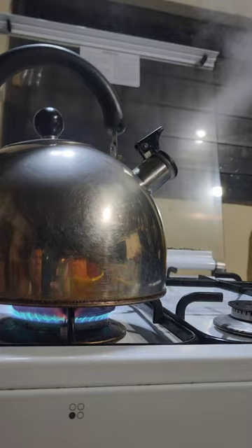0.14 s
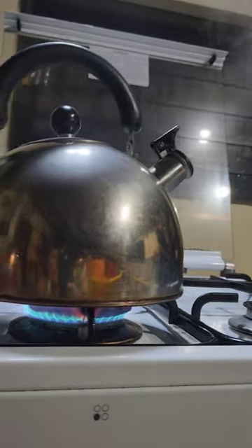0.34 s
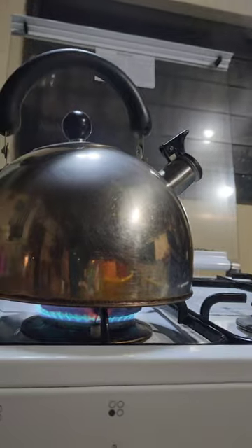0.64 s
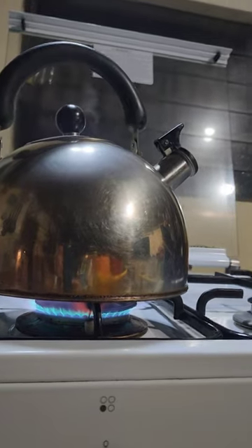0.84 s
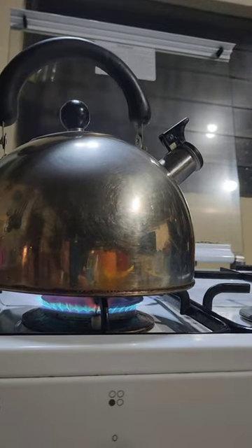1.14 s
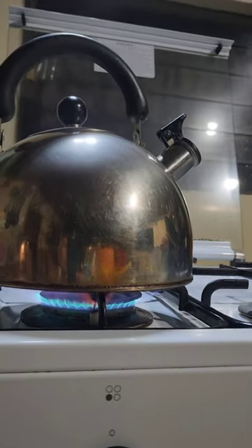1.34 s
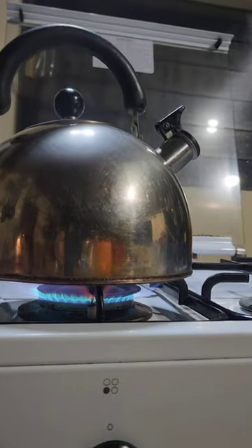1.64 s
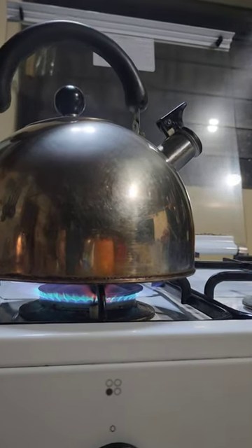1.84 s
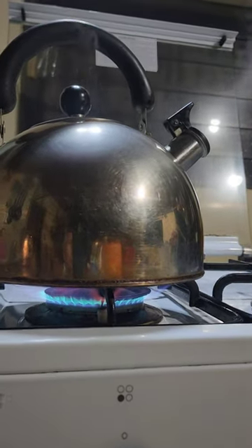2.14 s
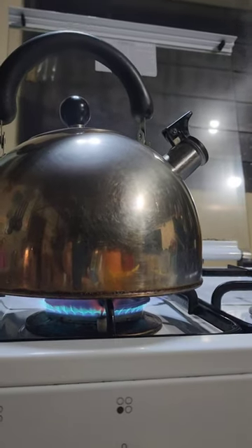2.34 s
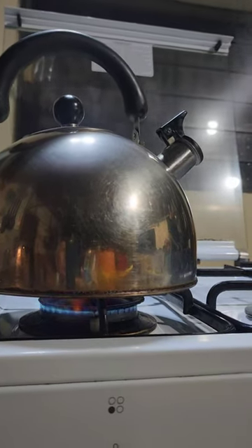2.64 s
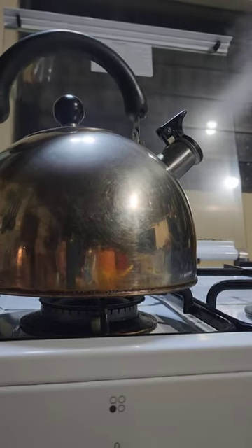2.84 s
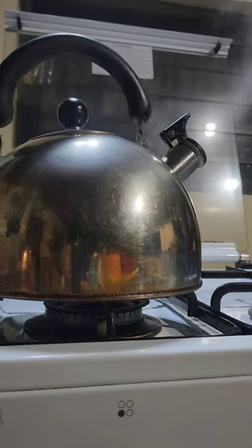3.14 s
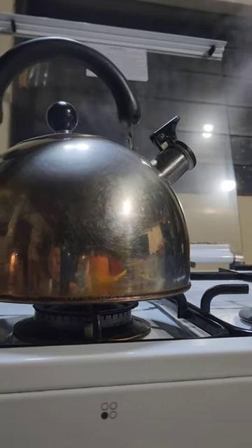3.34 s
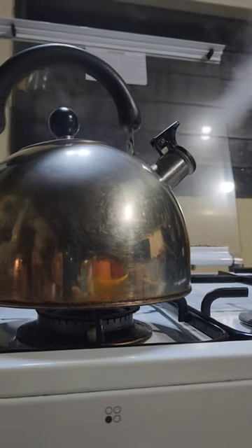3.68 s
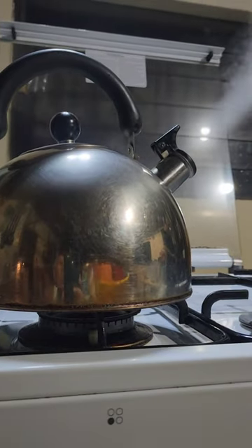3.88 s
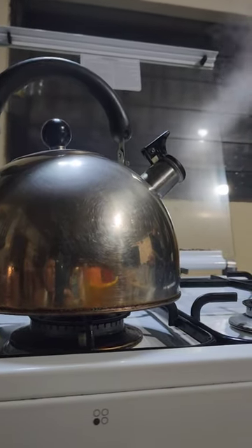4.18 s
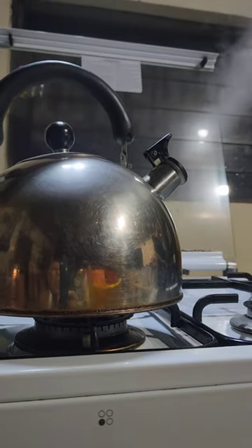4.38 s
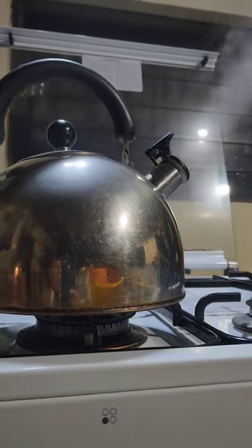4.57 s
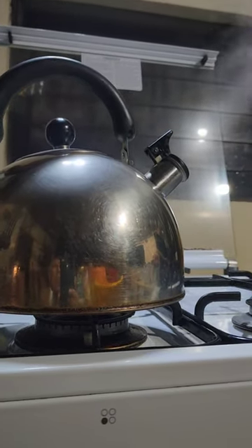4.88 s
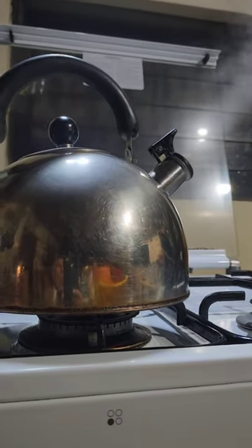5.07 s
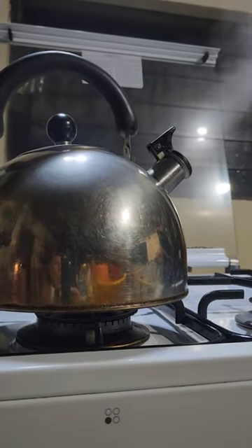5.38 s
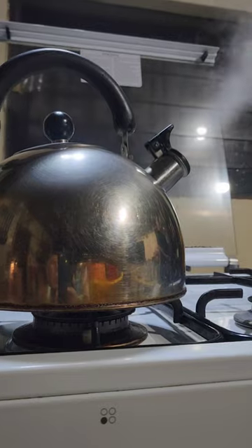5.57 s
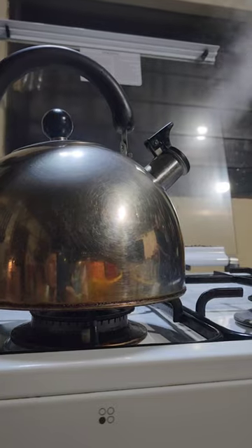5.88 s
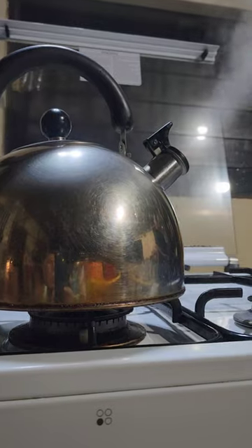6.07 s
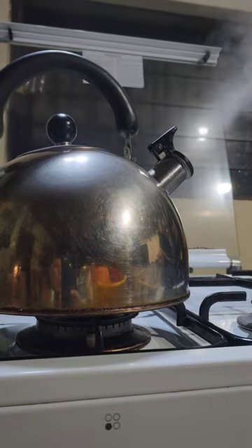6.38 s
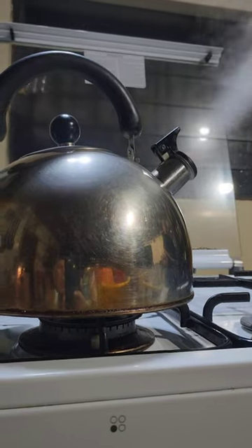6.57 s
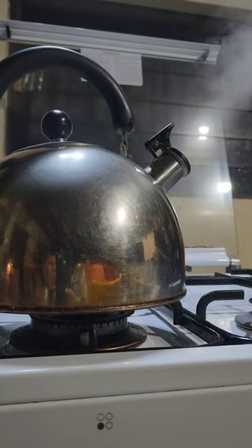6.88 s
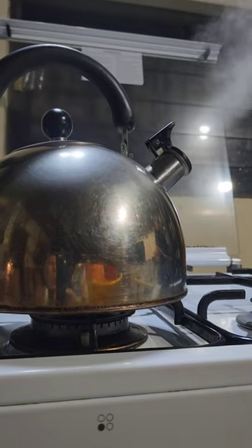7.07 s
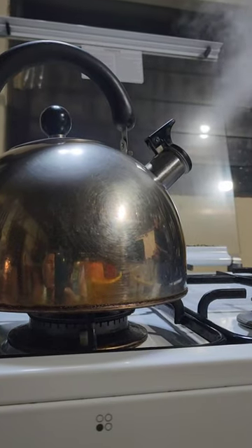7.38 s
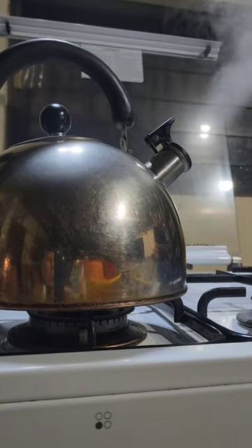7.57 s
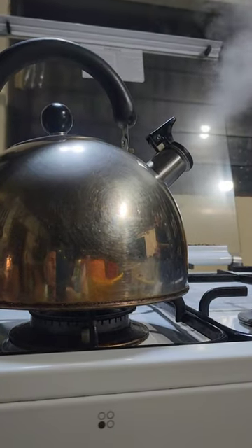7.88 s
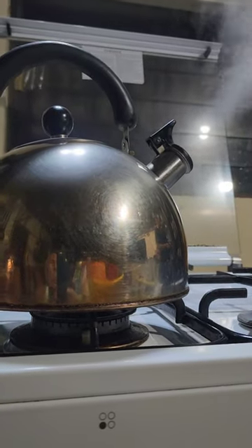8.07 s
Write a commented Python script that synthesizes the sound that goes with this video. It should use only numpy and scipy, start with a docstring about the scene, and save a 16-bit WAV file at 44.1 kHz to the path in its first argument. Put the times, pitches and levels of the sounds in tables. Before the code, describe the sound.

A steel kettle whistles shrill, rough and steady on a gas stove, then glides down in pitch as the flame goes off, jumping higher at the end.

```python
"""A rough, high whistle flutters over a rush of steam: a steel kettle on a gas stove in a small kitchen.
The tone and its harmonics are shaken in pitch and strength by turbulence and beat with the room's echoes.
Once the flame is off the jet slows and the tone slides down, until it jumps up to the next mode of the cap.
Filtered noise makes the hiss and the stove's rumble, a narrow band of it the drone of the water,
and decaying noise bursts in low resonances make soft knocks."""
import sys
import numpy as np
from scipy import signal
from scipy.io import wavfile
from scipy.ndimage import uniform_filter1d

SR = 44100
rng = np.random.default_rng(int(sys.argv[2]) if len(sys.argv) > 2 else 0)


def dump(signal):
    """Clip the signal to [-1, 1] and save it as 16-bit WAV at the path in sys.argv[1]."""
    limited = np.clip(np.atleast_2d(signal).T, -1, 1)
    pcm = np.round(limited * 32767).astype(np.int16)
    wavfile.write(sys.argv[1], SR, pcm)


N = 362502
TIME = np.arange(N) / SR
EDGE_HZ = 15750  # upper band limit of the whole sound
LAG = 7  # samples by which the right microphone hears the direct sound later


def amp(db):
    """Logarithmic level: decibels to an amplitude ratio."""
    return 10 ** (np.asarray(db) / 20)


def unit(x):
    """Normalisation of power: scales a signal to rms 1."""
    return x / np.sqrt(np.mean(abs(x) ** 2) + 1e-20)


def curves(rows, t=TIME):
    """Linear interpolation in time: one curve for each column of a table after the first."""
    s, *columns = np.transpose(rows)
    return [np.interp(t, s, c) for c in columns]


def read(points, hz):
    """Spectral envelope: a spectrum joined by straight lines over log frequency."""
    f, value = np.transpose(points)
    return np.interp(np.log(hz + 1), np.log(f), value)


def flutter(width_hz, order=2):
    """Narrow-band modulation: complex noise of rms 1 through one-pole low-passes with corner width_hz."""
    z = rng.standard_normal(N) + 1j * rng.standard_normal(N)
    r = np.exp(-2 * np.pi * width_hz / SR)
    for _ in range(order):
        z = signal.lfilter([1 - r], [1, -r], z)
    return unit(z)


def spin(hz):
    """Phase as the integral of frequency: a unit oscillation that follows a pitch curve."""
    return np.exp(2j * np.pi * np.cumsum(hz) / SR)


def noise(density_db, alike):
    """Spectral shaping with partial coherence: stereo noise whose level per Hz is density_db(Hz, s)."""
    white = rng.standard_normal((2, N)) * np.sqrt(SR / 2)
    hz, t, (a, b) = signal.stft(white, SR, nperseg=1024)
    same = np.clip(read(alike, hz), 0, 1)[:, None]
    pair = np.array([a, same * a + np.sqrt(1 - same ** 2) * b])
    shaped = pair * amp(density_db(hz, t))
    return signal.istft(shaped, SR, nperseg=1024)[1][:, :N]


def kitchen(t60, wet_db):
    """Reverberation: the direct path, then dense echoes from the tiles that fall 60 dB in t60 seconds."""
    t = TIME[:SR // 2]
    sparse = rng.standard_normal((2, len(t))) * (rng.random((2, len(t))) < .1)
    taps = sparse * (t > .002) * amp(-60 * t / t60)
    # echoes are set relative to the direct path
    taps *= amp(wet_db) / np.linalg.norm(taps, axis=1, keepdims=True)
    taps[0, 0] = taps[1, LAG] = 1
    return taps / np.linalg.norm(taps, axis=1, keepdims=True)


def echo(x, room):
    """Convolution with a room response: a sound as it reaches the two microphones."""
    return signal.fftconvolve(np.atleast_2d(x), room, axes=1)[:, :N]


def partial(z, room, level_db, span=0.13):
    """Interference with its own echoes: fast beats stay; the mean over span seconds is drawn to level_db."""
    heard = echo(z, room)
    power = uniform_filter1d(abs(heard) ** 2, int(span * SR), axis=1)
    # halfway between each side's own power and the mean of both, so some imbalance remains
    power = (power + power.mean(0)) / 2
    return np.sqrt(2) * amp(level_db) * heard.real / np.sqrt(abs(power) + 1e-9)


# Pitch of the main tone, which follows the speed of the jet. Each row: time in seconds, frequency in Hz.
MAIN_PITCH = [(0.0, 6160), (0.4, 6104.0), (0.52, 6123), (1.16, 6121), (1.68, 6106), (1.76, 6110),
              (2.8, 6114), (3.0, 6030), (3.36, 5758), (4.12, 5374), (4.2, 5290), (5.08, 4899), (5.84, 4566),
              (5.96, 4507), (6.64, 4230), (7.0, 4031), (7.32, 3921), (8.12, 3502)]
FULL_HZ = 6120  # pitch at full steam
BOIL_ENDS_S, BOIL_FADE_S = 3.36, 0.081  # the rolling boil dies away shortly after the flame is turned off


def jet(t=TIME):
    """Pitch proportional to flow speed: how hard the water boils (0-1), share of its speed the jet has lost."""
    hz, = curves(MAIN_PITCH, t)
    boil = .5 - .5 * np.tanh((t - BOIL_ENDS_S) / BOIL_FADE_S / 2)
    slow = np.maximum(1 - hz / FULL_HZ, 0)
    return boil, slow


# Spurts of steam that make the tone swell. Each row: start in seconds, nominal gain in dB.
STEAM_SPURTS = [(.1, 3.5), (.737, 7), (1.03, 5.5), (1.197, 7), (1.775, 4), (2.093, 2), (2.73, 5.5),
                (4.02, 3), (6.02, 4.5)]
SURGE_ATTACK_S, SURGE_LENGTH_S = 0.0072, 0.056
UNSTEADY_DB, UNSTEADY_HZ = 1.0, 9.8  # rms and bandwidth of the random swells


def surges():
    """Amplitude modulation in dB: each spurt rises fast and sinks back; smaller swells come at random."""
    out = UNSTEADY_DB * np.sqrt(2) * flutter(width_hz=UNSTEADY_HZ).real
    for s, gain_db in STEAM_SPURTS:
        age = np.maximum(TIME - s, 0)
        rise = np.minimum(age / SURGE_ATTACK_S, 1)
        out += gain_db * rise * np.exp(-(age / SURGE_LENGTH_S) ** 2)
    return out


# Loudness of the main tone before surges and panning. Each row: time in seconds, level in dB.
TONE_LEVEL = [(0.0, -18.5), (0.32, -13.5), (1.48, -17.5), (2.4, -13.5), (2.56, -19), (3.2, -12.0),
              (4.68, -15), (5.2, -13.5), (5.52, -17), (5.6, -12), (5.76, -15.8), (6.44, -17), (6.6, -20),
              (6.72, -11), (6.92, -23), (7.0, -19), (7.68, -20.5), (8.12, -26.5)]
# Where the tone is heard. Each row: time in seconds, left minus right level in dB.
TONE_PAN = [(0.0, 2), (0.2, 3.8), (0.36, 3), (0.64, 2), (1.28, 4.5), (5.52, 0), (6.12, -4.5), (6.84, 2.5),
            (7.4, 0.5), (7.6, 6), (8.0, -4), (8.12, 1.4)]
# Strength of the cap's next mode, rung by the jet. Each row: time in seconds, level in dB.
UPPER_LEVEL = [(0, -36), (2.8, -39), (3.8, -46.5), (6.1, -50), (6.7, -37.5), (7.6, -38.5), (7.87, -45.5),
               (8.13, -29.5), (8.22, -54.5)]
ROUGH_CALM, ROUGH_BOIL, ROUGH_SLOW = 0.22, 0.511, .45  # turbulence: base, added by boil, per lost speed
JITTER_HZ, WANDER_HZ = 61.4, 3  # depth of fast pitch shake per unit turbulence, and of slow wander
SHIMMER = 0.32  # depth of the strength's shake per unit turbulence
SECOND_DB, SECOND_SLOW_DB = -17, 32  # octave relative to the tone's usual level, and its gain per lost speed
THIRD_DB, FOURTH_DB = -23, -25.5  # harmonics relative to the tone's usual level
SKIRT_DB, SKIRT_WIDTH_HZ = -11, 750  # noise round the tone: level per unit turbulence, and bandwidth
UPPER_HZ, UPPER_SAG_HZ, UPPER_BEND = 7536, 6470, 1.38  # the next mode sinks by a power of the lost speed
SUM_BOIL_DB, SUM_CALM_DB = -4, -11.5  # sum tone of that mode and the main tone, relative to the mode
JUMP_S = 8.138  # the jet locks on to the next mode
RELEASE_DB_PER_S = 240  # the main tone dies away after the jump


def whistle(room):
    """Vortex shedding in the cap: turbulence shakes rate and strength; a slower jet has a stronger octave."""
    (hz,), (level_db,), (side_db,) = curves(MAIN_PITCH), curves(TONE_LEVEL), curves(TONE_PAN)
    upper_db, = curves(UPPER_LEVEL)
    boil, slow = jet()
    rough = ROUGH_CALM + ROUGH_BOIL * boil + ROUGH_SLOW * slow
    usual_db = uniform_filter1d(level_db, SR)  # one-second mean
    second_db = usual_db + SECOND_DB + SECOND_SLOW_DB * slow
    level_db = level_db + surges()

    # the tone runs cleaner whenever it swells above its usual level
    shake = rough * amp(-.5 * (level_db - usual_db))
    jitter = JITTER_HZ * shake * flutter(width_hz=124).real
    wander = WANDER_HZ * flutter(width_hz=20.28).real
    cycle = spin(hz + jitter + wander)
    strength = 1 + SHIMMER * shake * flutter(width_hz=47).real

    # powers of the cycle are its harmonics; the third and fourth sound only where the band can hold them
    out = partial(strength * cycle, room, level_db, span=0.11)
    out += partial(strength ** 2 * cycle ** 2, room, second_db, span=0.23)
    third = partial(strength ** 2 * cycle ** 3, room, usual_db + THIRD_DB, span=.15)
    out += third * (3 * hz < EDGE_HZ + 500)
    fourth = partial(strength ** 2 * cycle ** 4, room, usual_db + FOURTH_DB)
    out += fourth * (4 * hz < EDGE_HZ + 500)
    out *= amp(-RELEASE_DB_PER_S * np.maximum(TIME - JUMP_S, 0))

    # noise carried by the vortices spreads an airy skirt round the tone and its octave
    skirt = amp(usual_db + SKIRT_DB) * cycle + amp(second_db - 5.0) * cycle ** 2
    skirt *= rough * flutter(width_hz=SKIRT_WIDTH_HZ, order=3)

    # the next mode rings with noise and mixes with the main tone into a sum tone
    upper_hz = UPPER_HZ - UPPER_SAG_HZ * slow ** UPPER_BEND
    upper = amp(upper_db) * flutter(width_hz=310, order=3) * spin(upper_hz)
    upper *= 1 + amp(SUM_BOIL_DB * boil + SUM_CALM_DB * (1 - boil)) * cycle
    out += echo(np.sqrt(2) * (skirt + upper).real, room)
    return out * amp(np.array([side_db, -side_db]) / 2)


# Steam hiss before its colour. Each row: time in seconds, treble in dB per Hz, top in dB per Hz.
HISS_LEVEL = [(0, -74, -66.5), (3.1, -71.5, -65), (3.7, -74.5, -74), (4.9, -76, -76.5), (5.25, -79.5, -79),
              (5.55, -75.5, -71.5), (5.95, -73.5, -74), (6.2, -76.5, -74.5), (7.55, -75.5, -81.5),
              (7.88, -85.5, -88), (8.07, -76.5, -79), (8.2, -87, -90)]
# Colour of the hiss added to those levels. Each row: frequency in Hz, gain in dB.
HISS_COLOUR = [(200, -29), (600, -2), (1300, -1), (2000, 2), (2800, -3), (3500, -1.5), (4600, 0.5),
               (5600, 11.5), (6800, 3.5), (8500, 4.5), (10500, 2), (12000, -1.5), (14400, -1.5),
               (15700, -5)]
# Likeness of the hiss in the two channels. Each row: frequency in Hz, coherence from 0 to 1.
HISS_LIKENESS = [(100, 0.7), (500, 0.99), (1000, 0.8), (4000, 0), (15000, 0.2)]
# low part of the hiss before its colour, in dB per Hz: base, added by the boil, per lost speed
LOW_DB, LOW_BOIL_DB, LOW_SLOW_DB = -84, 5.5, 12.5


def hiss():
    """Broadband turbulence noise: its low part follows the boil and grows as the jet slows."""
    def density_db(hz, t):
        (treble_db, top_db), (boil, slow) = curves(HISS_LEVEL, t), jet(t)
        low_db = LOW_DB + LOW_BOIL_DB * boil + LOW_SLOW_DB * slow
        corners_hz = [2500, 4500, 9500, 12500]  # low, treble and top cross over between these
        total_db = read(HISS_COLOUR, hz)[:, None]
        for share, band_db in [([1, 0, 0, 0], low_db), ([0, 1, 1, 0], treble_db), ([0, 0, 0, 1], top_db)]:
            total_db = total_db + np.outer(np.interp(hz, corners_hz, share), band_db)
        return total_db
    return noise(density_db, HISS_LIKENESS) * amp(1.1 * flutter(width_hz=40).real)


# Low rumble of stove and room before the shifts below. Each row: frequency in Hz, level in dB per Hz.
RUMBLE_SPECTRUM = [(15, -82), (38, -70), (70, -72), (120, -77), (180, -83), (300, -85), (500, -85.5),
                   (1500, -110)]
# Shift of the deep rumble. Each row: time in seconds, gain in dB.
DEEP_GAIN = [(0, -6), (2.9, -1), (6.2, 0), (6.9, -5.5), (8.22, -5.5)]
# Drone of the boiling water. Each row: time in seconds, level in dB.
DRONE_LEVEL = [(0, -46), (.4, -66), (1.4, -58.5), (2.3, -58), (2.48, -48.5), (3.1, -54), (4.5, -56),
               (4.8, -83)]
RUMBLE_CALM_DB, RUMBLE_BOIL_DB = -2, 2.5  # shift of the upper rumble, and what the boil adds
DRONE_HZ, DRONE_RISE_HZ_PER_S = 99.4, 5.9  # the drone's centre climbs slowly


def stove():
    """Shaped low-frequency noise for the rumble; narrow-band resonance for water droning in the kettle."""
    def density_db(hz, t):
        (deep_db,), (boil, _) = curves(DEEP_GAIN, t), jet(t)
        upper = np.interp(hz, [50, 120], [0, 1])[:, None]
        upper_db = RUMBLE_CALM_DB + RUMBLE_BOIL_DB * boil
        return read(RUMBLE_SPECTRUM, hz)[:, None] + (1 - upper) * deep_db + upper * upper_db
    level_db, = curves(DRONE_LEVEL)
    wave = flutter(width_hz=10.7) * spin(DRONE_HZ + DRONE_RISE_HZ_PER_S * TIME)
    drone = np.sqrt(2) * amp(level_db) * wave.real
    # likeness of the two channels: (Hz, 0-1)
    return drone + noise(density_db, [(60, .995), (150, 0.99), (300, 0.91), (500, 0.83)])


# Soft knocks at the stove. Each row: start in seconds, nominal level in dB, centre in Hz,
# noise low-pass corner in Hz, time to fall 60 dB in seconds.
STOVE_KNOCKS = [(.09, -36, 92, 24.9, 0.46), (0.901, -29.5, 235, 95, 0.34), (0.951, -26, 236.7, 106, 0.15),
                (2.116, -39, 396, 106, 0.17), (2.43, -39, 250, 150, 0.37), (5.256, -33.5, 239.7, 106, 0.27),
                (5.375, -43, 297, 106, 0.12), (6.26, -43, 271, 106, 0.16)]


def knocks():
    """Damped resonance: each dull bump is a decaying noise burst round one low pitch, with a wider faint scuff."""
    out = np.zeros(N)
    for s, level_db, hz, width_hz, t60 in STOVE_KNOCKS:
        age = np.maximum(TIME - s, 0)
        body = flutter(width_hz) + amp(-9.5) * flutter(9 * width_hz)
        attack = 1 - np.exp(-age / 0.0087)
        decay = amp(level_db - 60 * age / t60)
        out += (body * np.exp(2j * np.pi * hz * TIME)).real * attack * decay
    return out


JUMP_ATTACK_S, JUMP_DB = 0.0038, -12  # level before panning
JUMP_HZ, OVERSHOOT_HZ, SETTLE_S = 5142, 35.2, 0.014  # its pitch starts a little sharp and settles


def jump(room):
    """Mode locking: the slowed jet catches the higher mode, with its octave and a faint half-pitch tone."""
    age = np.maximum(TIME - JUMP_S, 0)
    hz = JUMP_HZ + OVERSHOOT_HZ * np.exp(-age / SETTLE_S)
    half = spin((hz + 18 * flutter(width_hz=60).real) / 2)
    tone = half ** 2 * (1 + .1 * flutter(width_hz=140))
    out = partial(tone, room, JUMP_DB)
    out += partial(half ** 4, room, JUMP_DB - 27.5)  # octave
    out += partial(half * (1 + .2 * flutter(width_hz=150)), room, JUMP_DB - 34)
    return out * np.minimum(age / JUMP_ATTACK_S, 1) * amp([[1.5], [-1.5]])


def scene():
    """Superposition of the sources in the kitchen; the hiss is coloured by the nearest tiles."""
    room = kitchen(t60=0.2, wet_db=2.0)
    near_tiles = kitchen(t60=.08, wet_db=-7)
    return whistle(room) + jump(room) + echo(hiss(), near_tiles) + stove() + knocks()


def record(dry):
    """Hard clipping at a ceiling, then a linear-phase low-pass band limit."""
    limited = np.clip(dry, -.9, .9)
    lowpass = signal.firwin(1023, EDGE_HZ, window=("kaiser", 9), fs=SR)
    return signal.oaconvolve(limited, lowpass[None], "same")


dry = scene()
out = record(dry)
dump(out)
```